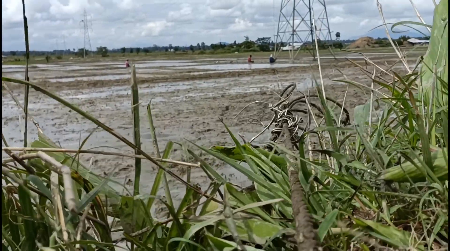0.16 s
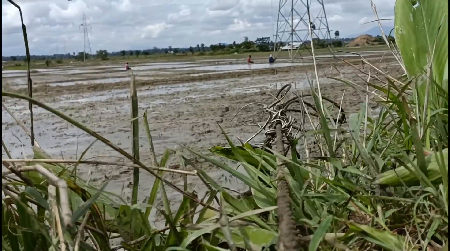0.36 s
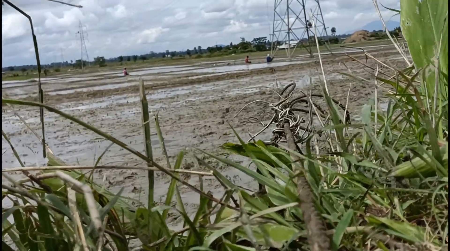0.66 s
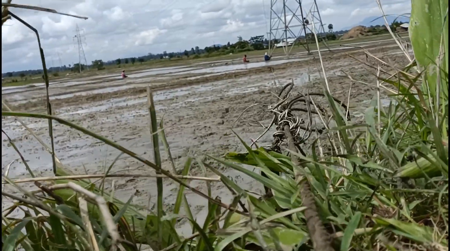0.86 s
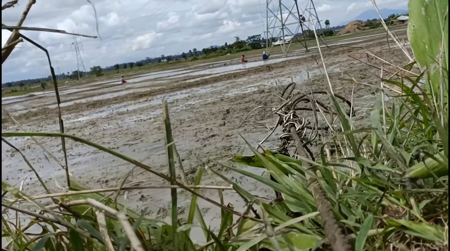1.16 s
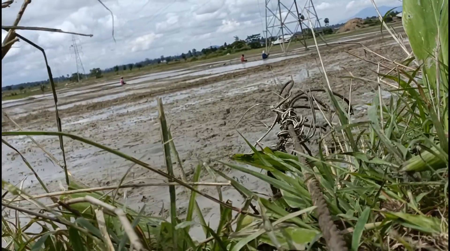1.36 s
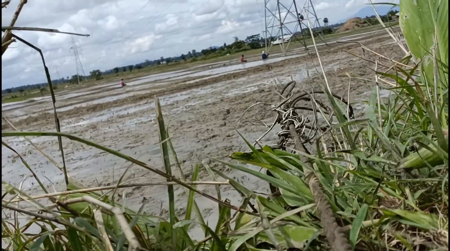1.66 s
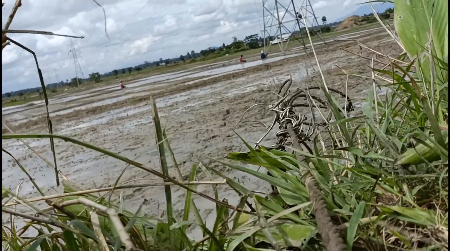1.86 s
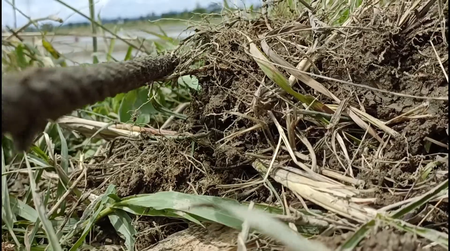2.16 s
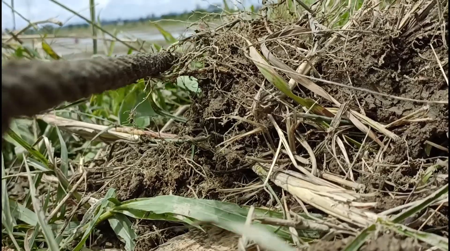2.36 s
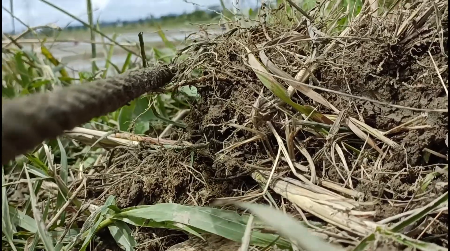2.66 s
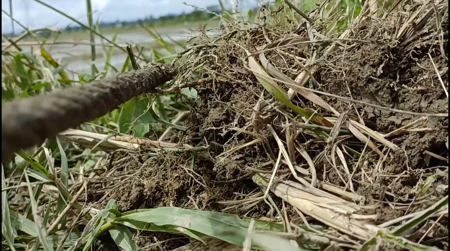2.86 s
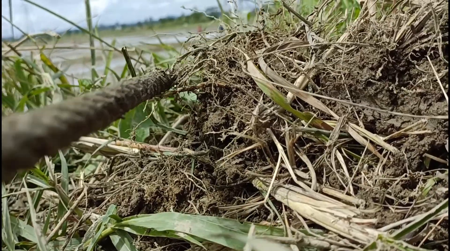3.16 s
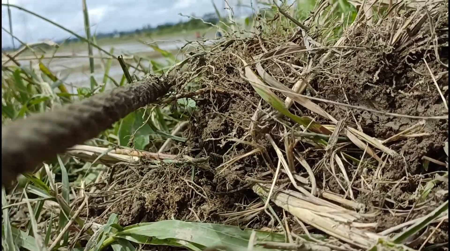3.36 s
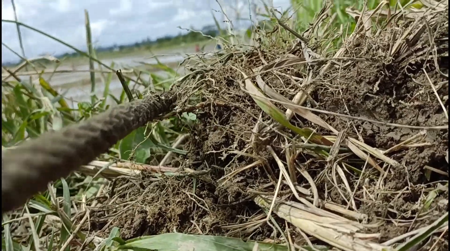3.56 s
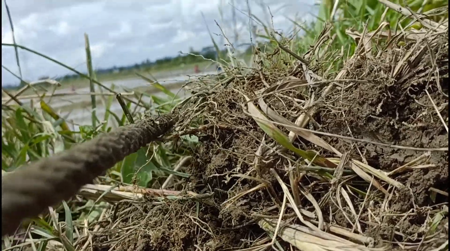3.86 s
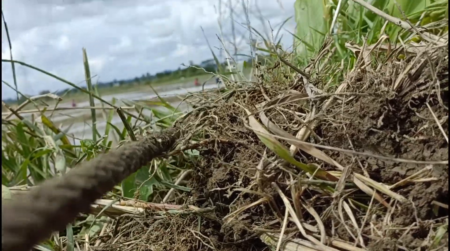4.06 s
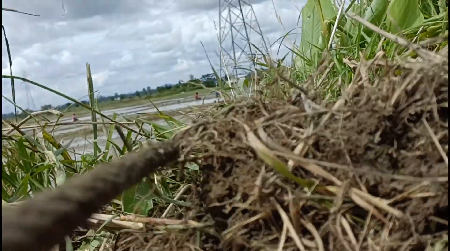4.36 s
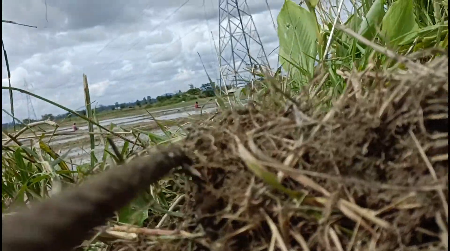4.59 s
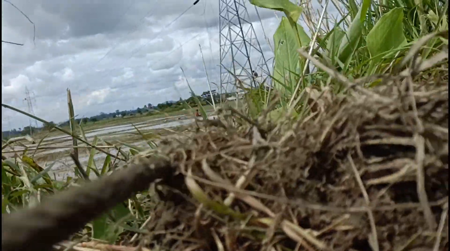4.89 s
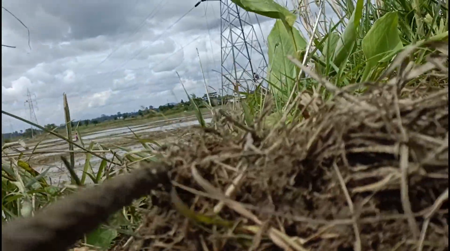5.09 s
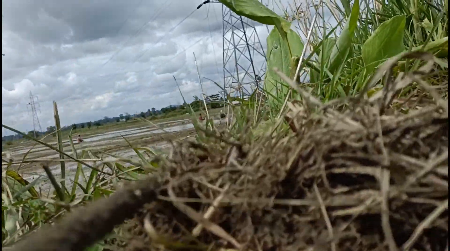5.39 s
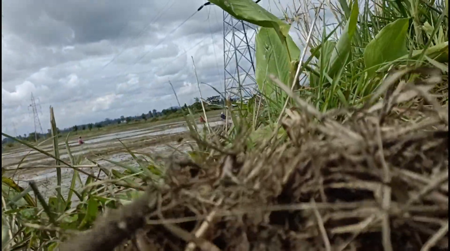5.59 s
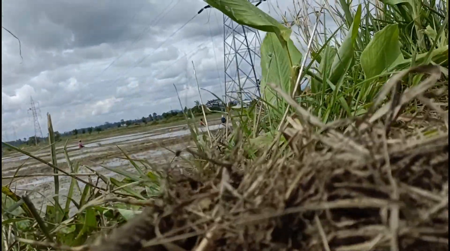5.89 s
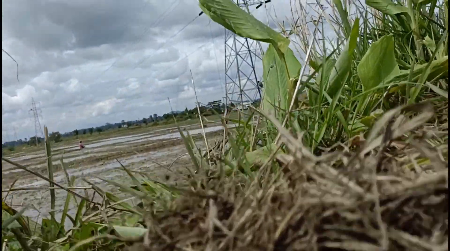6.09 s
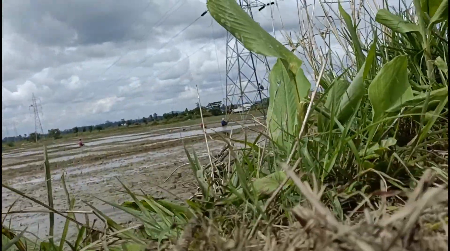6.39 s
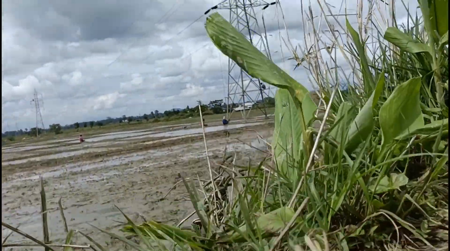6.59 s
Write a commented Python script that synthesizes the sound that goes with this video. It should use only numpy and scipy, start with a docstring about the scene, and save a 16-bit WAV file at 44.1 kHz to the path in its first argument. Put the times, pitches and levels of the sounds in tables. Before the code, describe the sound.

A hand-cranked ratchet winch clacks close by, steel pawl dropping in steady click-clack pairs, with gear knocks, small squeaks and low wind buffeting.

```python
"""Close by, gears knock, then a hand-cranked winch drops its steel pawl over the ratchet teeth.
The early drops are single, later ones mostly strong-weak pairs: noise ticks and clatter over decaying steel modes.
Rope and gears scrape in noise bursts; the axle squeaks as unsteady sines. Past 4.6 s the rope snaps once,
near 6 s the axle screeches in several partials. Throughout, gusts of low noise buffet mostly the left
microphone port, over a faint open-air hush and a far drone."""
import sys
import numpy as np
from scipy import signal
from scipy.fft import rfft, irfft
from scipy.io import wavfile
from scipy.ndimage import uniform_filter1d

SR = 44100
rng = np.random.default_rng(int(sys.argv[2]) if len(sys.argv) > 2 else 0)


def unload_audio(sound):
    """Save the sound as a 16-bit wav file, at the path given as the first command line argument."""
    columns = np.transpose(np.atleast_2d(sound))
    # keep every value between -1 and 1, then stretch to whole-number steps
    steps = np.round(np.clip(columns, -1, 1) * 32767)
    wavfile.write(sys.argv[1], SR, steps.astype(np.int16))


N = 297234  # samples

# Pawl drops. Each row: start in seconds, relative strength in dB, frame clatter against it in dB,
# high ring of the pawl in dB, ring length as a factor.
PAWL_DROPS = [(.1942, -9.5, -13, -4.5, 1.26), (.451, -10.5, -12.5, 5.5, 1.12), (.5664, -13, -15, 3.5, 1.09),
              (.7748, -14, -10.5, -6, .9), (1.1196, -12, -11, 1.5, 1.1), (1.4107, -13.5, -11.5, -2.5, 1.05),
              (1.4681, -20, -23, -10, 0.26), (1.6477, -15.5, -10, -6, .9), (1.715, -15, -20.5, 3.5, 0.41),
              (1.9686, -14, -7, -8, 1), (2.0471, -10.5, -14.5, 3.5, .8), (2.112, -23, -12.5, -26, 0.49),
              (2.398, -9, -16.5, 0, 0.98), (2.4594, -17.5, -11.5, -18, 0.58),
              (2.6863, -12.5, -11.5, -3.5, 1.34), (2.757, -16, -13, -27, 0.62),
              (2.9533, -15, -8.5, -4, 0.99), (3.0195, -19, -18, -12, 0.53), (3.2701, -12.5, -13, 5, 0.86),
              (3.3372, -25.5, -10, -31, 0.56), (3.6275, -11, -14, -0.5, 1.23),
              (3.7013, -14.5, -15.5, 4.5, 0.81), (3.931, -8.5, -16, 2.5, 1.18),
              (4.002, -18.5, -10, -4, 0.67), (4.2137, -12.5, -11.5, -1, 1.07),
              (4.2948, -15, -16, 5.5, 0.69), (4.5044, -12, -14, -3, 1.1), (4.5775, -16.5, -16.5, -9, 0.58),
              (4.8288, -9.5, -17.5, 3, 0.87), (4.8948, -17, -16, -8, 0.58), (5.1595, -8.5, -15, -4.5, 0.79),
              (5.223, -16.5, -16, -30, 0.45), (5.457, -12, -15, -1.5, 0.94), (5.5217, -14, -19.5, -9, 0.41),
              (5.712, -10, -15.5, -3.5, 0.79), (5.7773, -14.5, -22, -7, 0.44), (6.0478, -13, -13, 6, 0.91),
              (6.1152, -13, -26, 0, 0.51), (6.2065, -31, -4, -31, 1.7), (6.4046, -10, -16, -0.5, 1.2),
              (6.7072, -16.5, -10, -19, 1.55)]
# Where the pawl lands; it seats deeper as the crank gets going.
# Each row: time in seconds, position from 1 at the tooth's tip to 0 at its root.
LANDING = [(0, 0.89), (1.15, 1.0), (1.7, 0.89), (2.4, 0.051), (3.5, 0.025), (6.74, 0.14)]
# Frame clatter spectrum. Each row: frequency in Hz, relative density in dB per Hz.
FRAME_SPECTRUM = [(150, -25.5), (400, -5.5), (680, -10), (950, -1), (1250, -2), (2100, 3.5), (2800, 1),
                  (3400, 1), (4300, -5), (6500, -5.5), (9500, -14), (10900, -33), (12100, 1.5),
                  (13300, -24), (14300, -39), (15500, -61)]
# Pawl tick spectrum. Each row: frequency in Hz, relative density in dB per Hz.
TICK_SPECTRUM = [(300, -17.5), (1200, -7), (3200, 8), (6000, 1.5), (10000, 4), (13000, -7), (15500, -16)]
# Gear tooth spectrum, also for the pawl's slide. Each row: frequency in Hz, relative density in dB per Hz.
GEAR_SPECTRUM = [(150, -42.5), (500, -12), (1000, -4), (2100, 5.5), (2900, 3.5), (3900, 7.5), (5000, -1.5),
                 (7000, -8.5), (11000, -13), (15000, -26)]


def pawl(steel_db=-6, clatter_db=7, tick_db=-4, slide_db=-23, rattle_db=3.5, chatter_s=0.015,
         clatter_t60_s=0.076, tick_t60_s=0.024, slide_t60_s=0.034, tick_rise_s=0.00026, frame_rise_s=0.0035):
    """The pawl slides off one tooth, ticks on the next, rings, and rattles the frame while it settles."""
    out = np.zeros((2, N))
    ring_t = np.arange(SR // 3) / SR
    t = ring_t[:SR // 7]
    before = ring_t[:SR // 30][::-1]  # seconds left until the tick
    settle_fade = fade(np.hypot(t, chatter_s) - chatter_s, clatter_t60_s)
    settle = (1 - np.exp(-t / frame_rise_s)) * settle_fade
    tick_shape = fade(t, tick_t60_s) * (1 - np.exp(-t / tick_rise_s))
    landing_s, landing_tip = np.transpose(LANDING)
    for s, db, frame_db, ring_db, sustain in PAWL_DROPS:
        slide = amp(slide_db) * noise(GEAR_SPECTRUM, len(before)) * fade(before, slide_t60_s)
        contacts = amp(rattle_db * unit(uniform_filter1d(rng.standard_normal(len(t)), size=70)))
        rattle = noise(FRAME_SPECTRUM, len(t), ripple_db=3.5, grain=contacts)
        clatter = amp(clatter_db + frame_db) * rattle * settle
        tick = amp(tick_db) * noise(TICK_SPECTRUM, len(t)) * tick_shape
        ring = steel(ring_t, np.interp(s, landing_s, landing_tip), ring_db, sustain)
        add(out, s - before[0], amp(db) * slide)
        add(out, s, amp(db) * (tick + clatter))
        add(out, s, amp(db + steel_db) * ring)
    return out


# Mode pitches of pawl and wheel. Each entry: frequency in Hz, before detuning.
STEEL_HZ = [915, 1373, 1510, 2140, 2514, 3240, 3951, 4549, 4803, 6290, 6540, 7932, 8565, 8998, 11560, 11860,
            12004, 14192, 14380]
# The same modes in the same order. Each row: relative level in dB, base t60 in seconds, left-right in dB,
# left lead in radians, share of the pawl's high ring as a factor, extra on a tooth's tip in dB.
STEEL_MODES = [(-4.5, 0.081, -3.5, 0, -0.23, -4), (-25, 0.14, -4, -0.5, 0.2, -11),
               (-9, 0.055, -7, 0, -0.43, -10), (-9.5, 0.045, -7.5, 1.8, -0.18, 1),
               (-4.5, 0.083, -3, 0.5, -0.094, -4), (-7.5, 0.039, 3.5, 0.1, -0.34, 8),
               (-3, 0.079, -4, 2.5, -0.42, 17), (-19.5, 0.12, 6, 2.5, 0, 5.5),
               (-2.5, 0.076, 7, -2.07, -0.13, 2.5), (-7, 0.1, 8, -2.5, -0.44, 7),
               (-13.5, 0.067, 11.5, 1.3, -0.46, 14), (-6, 0.13, 4, 1.5, 0.6, -0.5),
               (-11.5, 0.1, -4, -0.5, 0.22, -6.5), (-1, 0.11, 9.5, 4, 0.16, 3),
               (-17.5, 0.17, 4, 1.5, 0.45, 17.5), (-20, 0.12, 1.5, -0.7, 0.28, -1),
               (-2, 0.23, 0.8, 1.89, .9, 3), (-7.5, 0.089, 3, 2, 0.64, 8), (-36.5, .35, -1.5, 2, .2, 8.5)]


def steel(t, tip, ring_db, sustain, rise_s=0.0031, scatter_db=4, detune=0.00056, damping=0.2, rebound=0.56):
    """Steel modes, struck once and nudged again by the pawl's rebound; where it lands sets their mix."""
    out = np.zeros((2, len(t)))
    rebound_s = rng.uniform(0.0052, 0.014)
    second = rebound * np.clip((t - rebound_s) / rise_s, 0, 1)
    scatter = rng.standard_normal((len(STEEL_MODES), 5))
    for hz, mode, (size, bend, loss, turn, nudge) in zip(STEEL_HZ, STEEL_MODES, scatter):
        db, t60_s, pan_db, lead_rad, ring_share, tip_db = mode
        life_s = max(sustain * t60_s * np.exp(damping * loss), .01)
        u = t[:int(life_s * SR)]
        swing = np.exp(2j * np.pi * (hz * (1 + detune * bend) * u + turn))
        # the rebound adds a weaker swing of each mode, a quarter cycle ahead or behind, which widens its line
        swing = swing * (1 + 1j * np.sign(nudge) * second[:len(u)])
        ports = np.array([[amp(pan_db / 2) * np.exp(1j * lead_rad)], [amp(-pan_db / 2)]])
        gain = amp(db + ring_share * ring_db + tip * tip_db + scatter_db * size)
        add(out, 0, gain * fade(u, life_s) * (ports * swing).real)
    return out * (1 - np.exp(-t / rise_s))


# Gear teeth knocking through their slack.
# Each row: start in seconds, relative strength in dB, brightness in dB per octave, t60 in seconds.
KNOCKS = [(0.0773, -21.5, -3.5, 0.13), (0.0935, -8, -2.5, 0.089), (0.187, -15.5, 0, 0.071),
          (.556, -20, 2, 0.062), (0.7592, -20.5, -1, 0.053), (0.7854, -12.5, 2, 0.16),
          (1.0275, -21, -0.5, 0.12), (1.1023, -15, 3, 0.054), (1.1663, -13.5, 5.5, 0.062),
          (1.253, -28, 3, 0.26), (1.281, -15.5, 2, 0.073), (1.3065, -18, -4, 0.056),
          (1.3323, -15.5, -2, 0.056), (1.5429, -15, -1.5, 0.042), (1.577, -6.5, -2, 0.045),
          (1.9, -23.5, 3.5, 0.052), (2.29, -32.5, -9, 0.056), (2.365, -25.5, -8, .1),
          (2.434, -13, 4, 0.034), (2.612, -22, -8.5, 0.052), (2.6586, -28, 7.5, 0.085),
          (2.807, -27, -.5, 0.052), (2.8454, -25, -9, 0.11), (3.143, -35, -11, 0.1),
          (3.7488, -14.5, -7, 0.041), (3.7732, -11, -6.5, 0.056), (3.8002, -21, -14, 0.15),
          (3.8158, -19, 7.5, 0.072), (3.8279, -22, -3, 0.064), (4.0098, -21.5, 1, .06),
          (4.351, -16.5, -0.5, 0.054), (5.0424, -20.5, -5, .1), (5.1263, -17, -5, 0.091),
          (5.297, -24, -7, 0.056), (5.381, -26.5, 1, 0.062), (5.4043, -18.5, -8.5, 0.081),
          (5.4518, -13.5, -5.5, 0.095), (6.1654, -8.5, 2, 0.068), (6.2604, -24.5, -1, 0.11),
          (6.3738, -21.5, -3, 0.06), (6.4508, -16, -1.5, 0.15), (6.4777, -9, 1, 0.047),
          (6.511, -26, 6, 0.057), (6.545, -31.5, 2, 0.11), (6.5844, -28.5, 3, 0.053),
          (6.6565, -14, -2.5, 0.067)]


def gears(level_db=-1, rise_s=0.002):
    """Loaded teeth damp each other: short knocks with no clear ring."""
    out = np.zeros((2, N))
    t = np.arange(SR // 9) / SR
    for s, db, tilt_db, t60_s in KNOCKS:
        shape = fade(t, t60_s) * (1 - np.exp(-t / rise_s))
        add(out, s, amp(db + level_db) * noise(GEAR_SPECTRUM, len(t), tilt_db, ripple_db=6) * shape)
    return out


# Dry snap of the tightening rope. Each row: start in seconds, relative level in dB.
SNAPS = [(4.6883, -15.5)]


def snaps(hz=1300, t60_s=0.0049):
    """The rope snaps as a swing of pressure that dies almost at once."""
    out = np.zeros((2, N))
    t = np.arange(SR // 20) / SR
    swing = 2 * np.sin(2 * np.pi * hz * t) * fade(t, t60_s)
    for s, db in SNAPS:
        add(out, s, amp(db) * np.ones((2, 1)) * swing)
    return out


# Stick-slip squeaks. Each row: start in seconds, length in seconds, mean pitch in Hz, relative level in dB.
SQUEAKS = [(0.45, .06, 4590, -30), (1.087, 0.028, 1926, -28.5), (1.17, 0.066, 1800, -40),
           (1.3593, 0.012, 4410, -21), (1.86, .053, 483, -42.5), (1.917, 0.066, 465, -34),
           (1.95, .1, 3040, -46), (2.423, .021, 2080, -31.5), (2.43, .014, 3990, -22),
           (2.803, 0.037, 2970, -38.5), (2.92, 0.13, 3030, -41), (3.079, 0.039, 1394, -36.5),
           (3.079, 0.031, 2820, -45.5), (3.809, 0.036, 3910, -30), (3.807, 0.038, 2000, -31),
           (3.841, 0.087, 1320, -37), (3.873, .04, 2130, -40), (3.88, .022, 4570, -44),
           (4.351, 0.0034, 4530, -20), (4.604, 0.45, 2640, -56), (5.467, 0.0206, 4830, -21),
           (5.516, 0.016, 4580, -21.5), (4.047, 0.0061, 4410, -29.5), (5.616, 0.017, 4490, -17.5),
           (5.638, 0.08, 3010, -37), (5.955, 0.082, 3010, -30.5), (5.983, 0.11, 2480, -32),
           (6.477, 0.0098, 1995, -19), (6.474, 0.013, 3840, -26), (6.484, 0.18, 3220, -41.5)]
# The one screech: start in seconds, length in seconds.
SCREECH_SPAN = (5.957, .076)
# Its partials. Each row: mean pitch in Hz, relative level in dB.
SCREECH_PARTIALS = [(6487, -25), (9835, -15), (11157, 0), (12845, -25), (13968, -21)]
# Its grit. Each row: frequency in Hz, relative density in dB per Hz.
GRIT_SPECTRUM = [(300, -33), (2000, -20), (4500, 8), (8000, 4), (10500, 3), (12500, 1), (14000, -16),
                 (15500, -20)]


def axle(level_db=2, screech_db=-19, grit_db=-30):
    """Stick-slip under load: short squeaks, and one gritty screech with several partials."""
    out = np.zeros((2, N))
    for s, length_s, hz, db in SQUEAKS:
        add(out, s, amp(db + level_db) * squeal(length_s, hz, waver_hz=35 * np.sqrt(hz / 3000)))
    s, length_s = SCREECH_SPAN
    for hz, db in SCREECH_PARTIALS:
        add(out, s, amp(screech_db + db) * squeal(length_s, hz, waver_hz=23.5, rough_db=3))
    grit = noise(GRIT_SPECTRUM, int(length_s * SR), ripple_db=4.5)
    add(out, s, amp(grit_db) * grit * signal.windows.tukey(grit.shape[1], .3))
    return out


def squeal(length_s, hz, waver_hz, lead_rad=1.18, rough_db=2):
    """Dry metal sticks and slips at one unsteady pitch."""
    size = max(int(length_s * SR), 32)
    waver, flutter = unit(uniform_filter1d(rng.standard_normal((2, SR)), size=120, axis=1))[:, :size]
    phase = 2 * np.pi * np.cumsum(hz + waver_hz * waver) / SR
    return np.sin([phase + lead_rad, phase]) * amp(rough_db * flutter) * signal.windows.tukey(size, .4)


# Slips of the rope through the gears. Each row: start in seconds, length in seconds, relative level in dB.
SCRAPES = [(.22, 0.027, -27.5), (.425, 0.1, -40), (.515, 0.074, -34), (.795, 0.039, -32), (.87, .13, -35),
           (1.095, 0.059, -27.5), (1.28, 0.15, -41.5), (1.55, 0.031, -29), (1.93, 0.014, -40),
           (2.425, 0.035, -29), (3.725, 0.049, -34), (3.775, 0.039, -26), (3.87, .08, -45),
           (5.415, .1, -32.5), (5.97, 0.19, -44.5), (6.2, 0.059, -35.5), (6.445, 0.029, -31.5),
           (6.68, .06, -44)]
# Rubbing spectrum, also for the field's tail. Each row: frequency in Hz, relative density in dB per Hz.
RUB_SPECTRUM = [(30, -32.5), (200, -1.5), (600, 0.5), (1300, -9.5), (2100, 2.5), (4200, -4.5), (6000, -7.5),
                (9000, -18), (15000, -21)]


def rubbing(grain_db=4, level_db=-4, creak_db=2, creaks_per_s=450, size_db=5.5, cycles=70):
    """Rope and gritty gears scrape in clumped slips; single slips ring briefly, each at its own pitch."""
    slips = amp(grain_db * unit(uniform_filter1d(rng.standard_normal(N), size=130)))
    scrape = noise(RUB_SPECTRUM, N, grain=slips)
    creak = np.zeros((2, N))
    t = np.arange(SR // 20) / SR
    when, pitch, size, lead = rng.random((int(creaks_per_s * N / SR), 4)).T
    pitch_hz = 900 * 8 ** pitch
    # many small slips, few large ones
    gain = amp(read(RUB_SPECTRUM, pitch_hz) - size_db * np.log(np.maximum(1 - size, .02)))
    for s, hz, g, turn in zip(when * N / SR, pitch_hz, gain, lead):
        u = t[:int(cycles / hz * SR)]  # a slip dies within so many cycles
        phase = 2 * np.pi * hz * u
        shape = fade(u, cycles / hz) * (1 - fade(u, 10 / hz))
        add(creak, s, g * np.sin([phase + np.pi * turn, phase]) * shape)
    load = surges(SCRAPES, rise_s=0.018, sag_db=0.5, t60_s=0.2, idle_db=-56.5)
    return (scrape + amp(creak_db) * unit(creak)) * amp(level_db) * load


def field(x, wet_db=-24, t60_s=0.12, build_t60_s=0.056):
    """Bank and grass scatter a weak, dull tail."""
    t = np.arange(SR // 2) / SR
    tail = noise(RUB_SPECTRUM, len(t)) * fade(t, t60_s) * (1 - fade(t, build_t60_s))
    echo = signal.fftconvolve(x, tail / np.linalg.norm(tail[0]), axes=1)[:, :N]
    return x + amp(wet_db) * echo


# Gusts at the ports. Each row: start in seconds, length in seconds, relative pressure in dB.
GUSTS = [(0, 0.033, -35), (.185, 0.064, -31.5), (.305, 0.066, -24.5), (.535, 0.047, -25),
         (.615, 0.1, -27.5), (.775, .06, -24.5), (1.32, 0.13, -37), (1.488, 0.016, -18.5),
         (1.565, 0.076, -31.5), (1.755, 0.15, -30), (2.065, 0.047, -35), (2.36, 0.027, -26.5),
         (2.505, 0.048, -28.5), (2.6, 0.0082, -28), (5.04, 0.082, -22), (5.195, 0.051, -20.5),
         (5.37, 0.14, -37), (5.72, 0.036, -30), (5.83, 0.091, -29.5), (6.025, 0.06, -29.5),
         (6.155, 0.14, -36), (6.52, 0.083, -28.5), (6.627, 0.034, -14.5), (6.7, 0.051, -31)]
# Wind spectrum before levelling. Each row: frequency in Hz, relative density in dB per Hz.
WIND_SPECTRUM = [(15, -19.5), (35, -7.5), (65, 3.5), (130, 3), (190, -7), (280, -10), (400, -31.5),
                 (800, -43.5), (2000, -61.5)]


def wind(left_db=8.5, right_db=-5, calm_db=-44, low_cut_hz=50):
    """Eddies hit each port separately and sink between gusts; the microphone loses the deepest bass."""
    hz = np.fft.rfftfreq(N, 1 / SR)
    eddies = irfft(rfft(rng.standard_normal((2, N))) * amp(read(WIND_SPECTRUM, hz)), N)
    eddies /= np.sqrt(uniform_filter1d(eddies ** 2, size=900, axis=1))  # even out the level
    pressure = surges(GUSTS, rise_s=0.0093, sag_db=6.5, t60_s=0.19, idle_db=-49)
    gust = pressure ** 2 / np.hypot(pressure, amp(calm_db))  # weak pressure is pushed further down
    buffet = eddies * uniform_filter1d(gust, size=200) * amp([[left_db], [right_db]])
    low_cut = signal.butter(2, low_cut_hz, "high", fs=SR, output="sos")
    return signal.sosfilt(low_cut, buffet)


# Open-air spectrum. Each row: frequency in Hz, relative density in dB per Hz.
HUSH_SPECTRUM = [(15, -41), (39, -11), (62, -12), (103, 2.5), (190, -10.5), (310, 2.5), (410, -10.5),
                 (630, -14), (1000, -17), (2600, -32), (4000, -27), (6500, -39.5), (10000, -35.5),
                 (15000, -37.5)]


def hush(level_db=-46, drone_db=-58, drone_hz=500, wander_hz=6):
    """Open air as steady coloured noise, with a faint far drone of wandering pitch."""
    drift = np.cumsum(unit(uniform_filter1d(rng.standard_normal(N), size=2000))) / SR
    drone = np.sin(2 * np.pi * (drone_hz * np.arange(N) / SR + wander_hz * drift))
    return amp(level_db) * noise(HUSH_SPECTRUM, N) + amp(drone_db) * drone


def surges(events, rise_s, sag_db, t60_s, idle_db):
    """A level over time: each surge swells, sags while it lasts and dies away, over a steady idle level."""
    t = np.arange(N) / SR
    power = amp(idle_db) ** 2 * np.ones(N)
    for s, length_s, db in events:
        near = slice(max(int((s - .2) * SR), 0), int((s + length_s + .4) * SR))
        u = t[near] - s
        swell = np.exp(np.minimum(u, 0) / rise_s)
        sag = amp(db - sag_db * np.clip(u / length_s, 0, 1))
        power[near] += (sag * swell * fade(np.maximum(u - length_s, 0), t60_s)) ** 2
    return np.sqrt(power)


# How the two ports hear noise.
# Each row: frequency in Hz, likeness from 0 to 1, left lead in radians, left-right in dB.
PORTS = [(96.3, 0.89, -6.5, -9.5), (457, 0.9, 1, -2), (1590, 0.35, -0.15, -8), (2107, 0.12, 4, -2.5),
         (3450, 0.67, 1, -2), (4490, 0.246, 3.5, -9.5), (7080, 0.366, -1.5, 3.5), (15900, 0.15, -0.5, -4)]


def noise(spectrum, size, tilt_db=0, ripple_db=0, grain=1):
    """Coloured noise as the two ports hear it; the ripple gives each blow its own resonances."""
    hz = np.fft.rfftfreq(size, 1 / SR)
    a, b = rfft(rng.standard_normal((2, size)) * grain)
    same = np.clip(read(PORTS, hz, axis=1), 0, 1)
    right = (same * a + np.sqrt(1 - same ** 2) * b) * np.exp(-1j * read(PORTS, hz, axis=2))
    side = amp(read(PORTS, hz, axis=3) / 2)
    octaves = np.log2(np.maximum(hz, 300) / 2200)  # the tilt pivots at 2200 Hz
    knots_hz = np.geomspace(500, 16000, 60)
    ripple = np.interp(hz, knots_hz, rng.standard_normal(len(knots_hz)))
    colour = amp(read(spectrum, hz) + tilt_db * octaves + ripple_db * ripple)
    return unit(irfft(np.array([a * side, right / side]) * colour, size))


def amp(db):
    """Decibels to gain."""
    return 10 ** (np.asarray(db) / 20)


def unit(x):
    """Scales to rms 1."""
    return x / np.sqrt(np.mean(x ** 2) + 1e-20)


def read(points, hz, axis=1):
    """One column of a table, on a log-frequency axis."""
    table = np.array(points, float)
    return np.interp(np.log(hz + 1), np.log(table[:, 0] + 1), table[:, axis])


def add(mix, s, sound):
    """Lays a stereo sound into the mix at time s."""
    part = mix[:, max(round(s * SR), 0):][:, :sound.shape[1]]
    part += sound[:, :part.shape[1]]


def fade(t, t60_s):
    """Free decay by 60 dB in t60_s."""
    return np.exp(-np.log(1000) * t / max(t60_s, 1e-3))


def scene():
    """The winch with the field's tail, then wind and open air."""
    winch = pawl() + gears() + snaps() + axle() + rubbing()
    return field(winch) + wind() + hush()


def record(dry, ceiling=.92, edge_hz=15600):
    """The recorder rounds off the highest peaks; then its band limit."""
    rounded = dry / (1 + (dry / ceiling) ** 6) ** (1 / 6)
    band_limit = signal.firwin(255, edge_hz, window=("kaiser", 9), fs=SR)
    return signal.oaconvolve(rounded, band_limit[None], "same")


dry = scene()
out = record(dry)
unload_audio(out)
```